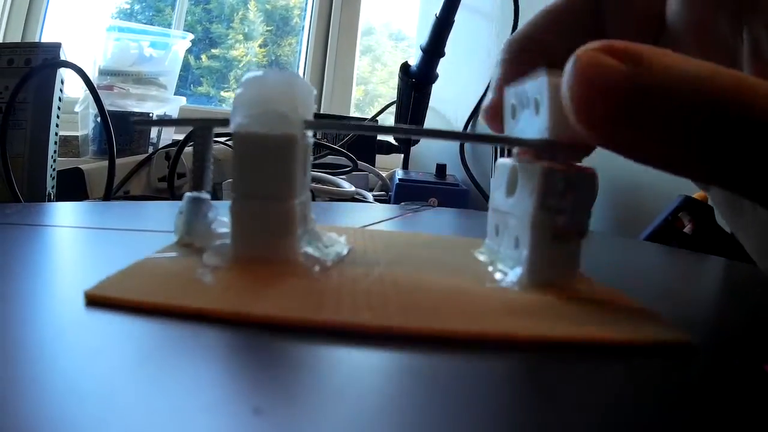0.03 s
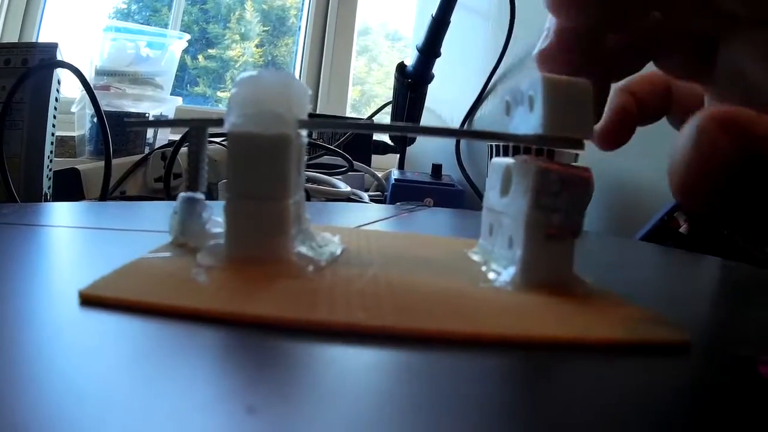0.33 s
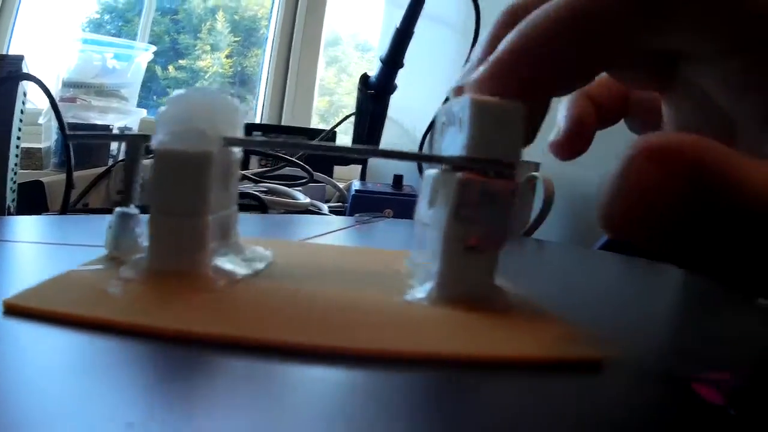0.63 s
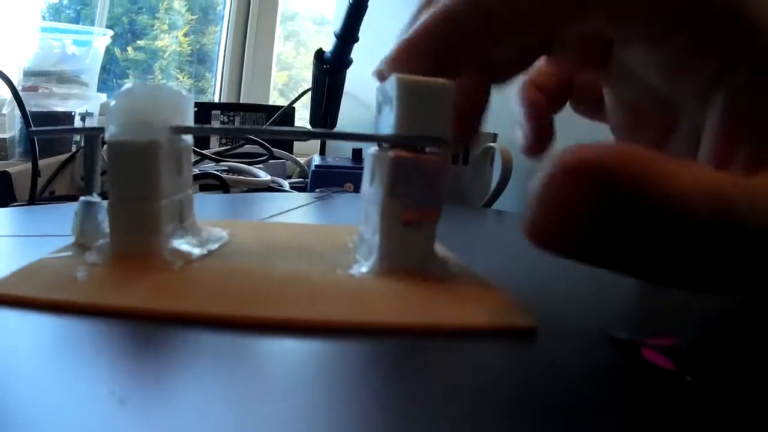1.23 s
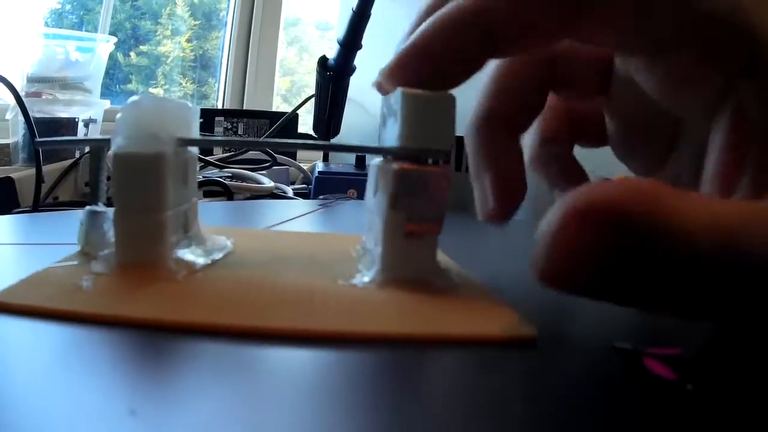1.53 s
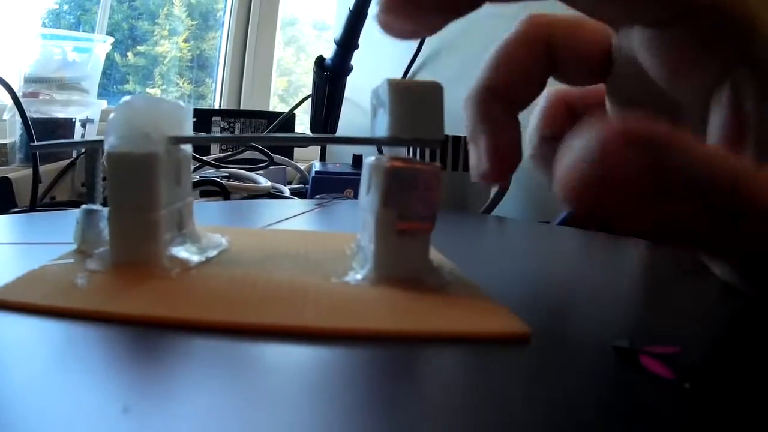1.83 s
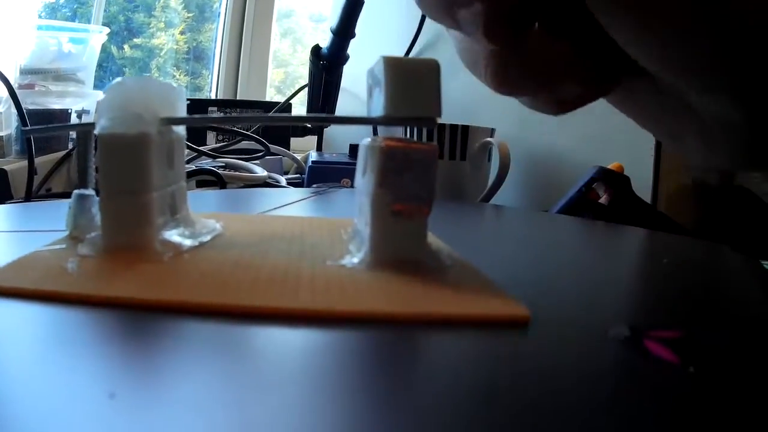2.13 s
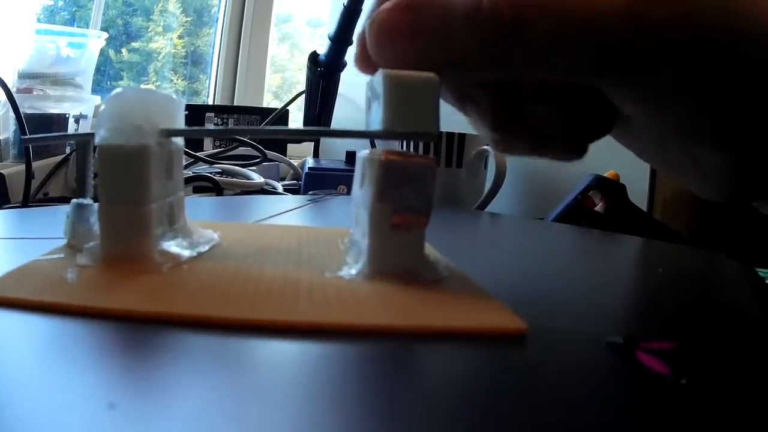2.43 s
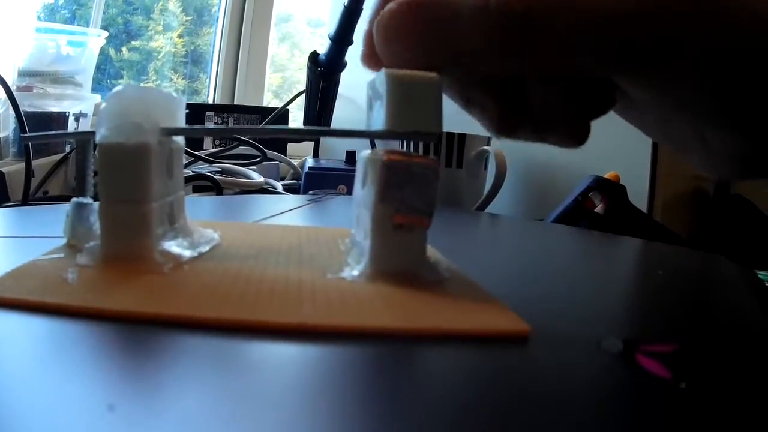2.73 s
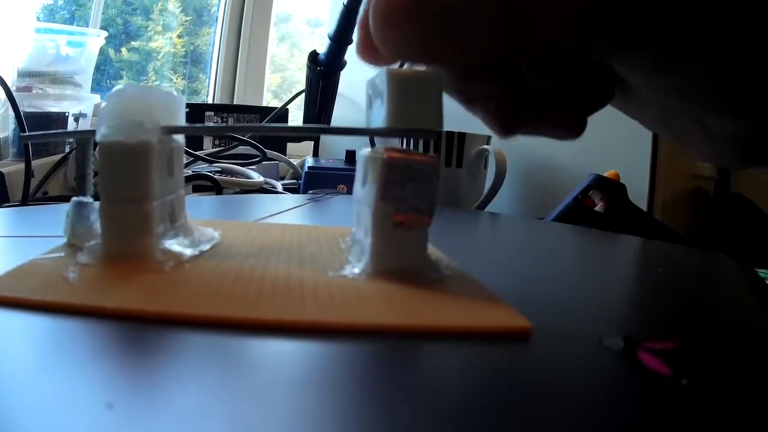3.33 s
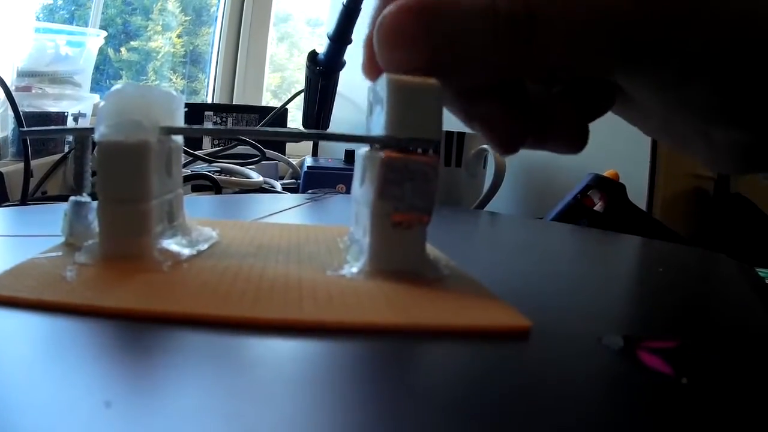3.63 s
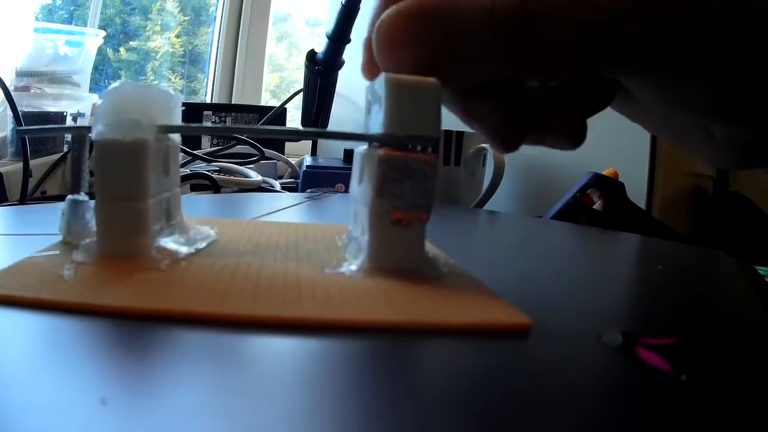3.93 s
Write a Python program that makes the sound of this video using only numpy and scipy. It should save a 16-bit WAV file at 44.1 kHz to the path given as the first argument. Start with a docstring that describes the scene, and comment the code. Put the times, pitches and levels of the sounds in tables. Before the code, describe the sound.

A homemade telegraph key knocks dully on a desk as a finger taps it unevenly.

```python
"""First comes a short wooden clatter: a homemade telegraph key is jostled on a desk in a small room.
Then a finger taps its metal lever onto a wooden post, close by. Each press knocks the baseboard,
brighter when harder, and the lever falls back softly on its rear stop. A few sharp ticks sound early on,
fingers rub faintly on the key, and halfway through a mains hum comes in over the quiet room noise."""
import sys
import numpy as np
from scipy import signal
from scipy.fft import rfft, irfft, next_fast_len
from scipy.io import wavfile
from scipy.ndimage import uniform_filter1d

SR = 44100
rng = np.random.default_rng(int(sys.argv[2]) if len(sys.argv) > 2 else 0)


def digitize_waveform(pressure):
    """Quantize a signal to 16-bit integers and store it at the path in sys.argv[1].

    Rows of a 2-D input are taken as channels; values are limited to [-1, 1].
    """
    field = np.atleast_2d(pressure).T
    bounded = np.clip(field, -1, 1)
    quanta = np.round(bounded * 32767).astype(np.int16)
    wavfile.write(sys.argv[1], SR, quanta)


N = 176400  # 4 seconds


def amp(db):
    """Turns decibels into a number to multiply a sound by."""
    return 10 ** (np.asarray(db) / 20)


def unit(x):
    """Scales a sound to an average (rms) level of 1."""
    return x / np.sqrt(np.mean(x ** 2) + 1e-20)


def along(points, hz):
    """Reads between the rows of a (pitch_hz, value) table, on a log pitch scale."""
    pitches, values = np.transpose(points)
    return np.interp(np.log(hz + 1), np.log(pitches + 1), values)


def filtered(x, gain_at):
    """Turns each frequency up or down by gain_at(hz)."""
    size = next_fast_len(len(x) + SR // 2)
    return irfft(rfft(x, size) * gain_at(np.fft.rfftfreq(size, 1 / SR)), size)[:len(x)]


def noise(tone, size):
    """Noise of level 1, shaped by a (pitch_hz, level_db) table."""
    return unit(filtered(rng.standard_normal(size), lambda hz: amp(along(tone, hz))))


def ring_time():
    """The half second after a blow, in seconds."""
    return np.arange(SR // 2) / SR


def fade(t, fade_s, hold_s=0):
    """Stays full for hold_s, then drops 60 dB every fade_s."""
    return np.exp(-np.log(1000) * np.maximum(t - hold_s, 0) / fade_s)


def ring(tones, hold_s=0, scatter_db=1.16):
    """A struck object rings with fading tones of alternating sign, a little different at each blow."""
    t, out = ring_time(), 0
    for k, (pitch_hz, level_db, fade_s) in enumerate(tones):
        gain = (-1) ** k * amp(level_db + scatter_db * rng.normal())
        out += gain * fade(t, fade_s, hold_s) * np.sin(2 * np.pi * pitch_hz * t)
    return out


def add(track, start_s, sound):
    """Mixes a sound into the track at start_s."""
    part = track[round(start_s * SR):][:len(sound)]
    part += sound[:len(part)]


# the tone of the room noise: pitch_hz, level_db
BACKGROUND_TONE = [(20, -9), (70, -8), (120, -8), (200, -14), (420, -20), (820, -22.5), (1250, -21),
                   (1600, -16.5), (2100, -27), (4000, -28.5), (8000, -30), (15800, -30.5)]

def room_noise(level_db=-66):
    """A faint, steady rush, strongest in the bass."""
    return amp(level_db) * noise(BACKGROUND_TONE, N)


def mains_hum(start_s=1.927, rise_s=0.048, pitch_hz=50, start_db=-60, growth_db_per_s=1.2):
    """A low electrical hum switches on and slowly grows."""
    t = np.arange(N) / SR - start_s
    switch_on = np.clip(t / rise_s, 0, 1)
    return switch_on * amp(start_db + growth_db_per_s * t) * np.sin(2 * np.pi * pitch_hz * t)


# how long the echoes take to die away: pitch_hz, fade_s
ECHO_FADES = [(100, 0.34), (300, 0.15), (1000, 0.25), (2000, 0.22), (4000, .22), (10000, .12)]
# the tone of the echoes: pitch_hz, level_db
ECHO_TONE = [(40, 5), (90, -0.5), (160, 6.5), (230, 3), (380, -4.5), (520, 4.5), (700, 1.5), (1100, -2),
             (1550, 0.5), (2000, -6.5), (2350, -9.5), (2650, -17.5), (3300, -15), (4200, -10), (5200, -16),
             (16000, -10)]

def wall_echoes(delay_s=0.0027, hold_s=0.028):
    """The walls send back a dense cloud of echoes that holds briefly, then dies, treble first."""
    t = ring_time()
    typical_fade = fade(t, np.median(np.array(ECHO_FADES)[:, 1]), hold_s)
    cloud = rng.standard_normal(len(t))
    for _ in range(3):  # even out the noise so that no pitch sticks out
        power = uniform_filter1d(np.abs(rfft(cloud * typical_fade)) ** 2, size=40)
        cloud = irfft(rfft(cloud) / np.sqrt(np.abs(power) + 1e-12), len(t))
    cloud = unit(filtered(cloud, lambda hz: amp(along(ECHO_TONE, hz))))
    band_hz, times_s, bands = signal.stft(cloud, SR, nperseg=256)
    bands *= fade(times_s, along(ECHO_FADES, band_hz)[:, None], hold_s)
    echoes = signal.istft(bands, SR, nperseg=256)[1][:len(t)]
    return echoes * np.clip(t / delay_s - 1, 0, 1)


# the dull sound of skin on the key: pitch_hz, level_db
SKIN_TONE = [(40, -13), (150, 5.5), (700, 9.5), (1400, -4), (2200, -15.5), (5000, -21), (16000, -35)]
# the scratchy part of a rub: pitch_hz, level_db
SCRATCH_TONE = [(200, -14), (1200, -4), (1550, 12), (2100, -25), (3000, -4), (4300, -9), (6000, -23),
                (16000, -29)]
# each rub: start_s, length_s, level_db, scratch_db
FINGER_RUBS = [(0, 0.071, -60.5, -20), (2.045, 0.013, -67.5, 6), (2.301, 0.022, -59.5, -24)]

def finger_rubs(rise_s=0.0017):
    """Skin slides on the key: a dull brush with some scratch on top."""
    out, t = np.zeros(N), ring_time()
    for start_s, length_s, level_db, scratch_db in FINGER_RUBS:
        skin = noise(SKIN_TONE, len(t)) + amp(scratch_db) * noise(SCRATCH_TONE, len(t))
        swell = (1 - np.exp(-t / rise_s)) * fade(t, fade_s=0.081, hold_s=length_s)
        add(out, start_s, amp(level_db) * skin * swell)
    return out


# each tick: start_s, level_db
SHARP_TICKS = [(0.5671, -30), (.757, -37), (.771, -44), (0.7839, -47.5), (0.793, -54)]
# the tones in a tick: pitch_hz, level_db, fade_s
TICK_RING = [(1530, -1, 0.0066), (2860, -0.5, 0.0026), (3770, 2, 0.0045), (5000, -11.5, 0.0036),
             (7100, -11.5, 0.0054), (13700, -14.5, 0.0042)]

def ticks():
    """Tiny bright ticks, very close and with no echo."""
    out = np.zeros(N)
    for start_s, level_db in SHARP_TICKS:
        add(out, start_s, amp(level_db) * ring(TICK_RING))
    return out


# the tones of the desk under the key: pitch_hz, level_db, fade_s
DESK_RING = [(72, -35, 0.047), (95, -1, 0.067), (119, 1.5, 0.1), (162.5, -4.5, 0.34), (221, -5, 0.041),
             (307, -3, 0.3)]
# the crack of metal making contact: pitch_hz, level_db
CRACK_TONE = [(300, 5.5), (2000, 2.5), (4000, 1), (4800, -11.5), (5700, -4), (6800, -10), (8500, -20.5),
              (10500, -12), (12000, -12), (16000, -22)]
FREE_RING_S = 0.0031  # the key rings freely until the finger's pressure damps it

def knock(tones, bright_hz, bass_db, walls, desk_db, echo_db=-16, fresh_share=0.58):
    """One blow rings the wood, thumps the desk and cracks; a softer contact dulls the wood and echoes."""
    t = ring_time()
    wood = ring(tones, FREE_RING_S) * (1 - np.exp(-t / 0.000052))  # starts almost at once
    # each blow mixes the shared room echoes with fresh random ones
    echoes = np.sqrt(1 - fresh_share) * walls + np.sqrt(fresh_share) * wall_echoes()
    crack_gain = amp(-12) * (bright_hz / 2500) ** 1.6  # harder blows crack louder
    crack = crack_gain * noise(CRACK_TONE, len(t)) * fade(t, fade_s=0.009)
    cut_treble = signal.butter(3, bright_hz, fs=SR, output="sos")
    body = signal.sosfilt(cut_treble, wood + amp(echo_db) * echoes) + amp(desk_db) * ring(DESK_RING)
    bass = signal.sosfilt(signal.butter(1, 376, fs=SR, output="sos"), body)  # the part below 376 Hz
    return body + (amp(bass_db) - 1) * bass + crack


# the tones of the baseboard slapping the desk: pitch_hz, level_db, fade_s
BOARD_RING = [(104, -1, 0.076), (152.3, -1, 0.092), (259, -10.5, 0.042), (370, -5, 0.043),
              (613, -8.5, 0.09), (760, -4.5, 0.011), (833, -8, 0.014), (1086, -0.5, 0.017),
              (1445, -5, 0.009), (1820, -13, 0.013), (2190, -22, 0.013), (3760, -8.5, .008),
              (5760, -16, 0.0086)]
# each jolt: start_s, level_db, bright_hz (treble is cut above it), bass_db (bass boost or cut)
BOARD_JOLTS = [(0.0412, -45, 3170, -10), (0.0448, -48.5, 2360, -10), (0.0825, -28.5, 2380, -1.5),
               (.0866, -31.5, 4850, 3.5), (0.1167, -34.5, 2460, -7.5), (0.1276, -47, 4320, 0),
               (1.796, -45.5, 1700, -8)]

def board_jolts(walls):
    """The key is jostled, so its baseboard slaps the desk."""
    out = np.zeros(N)
    for start_s, level_db, bright_hz, bass_db in BOARD_JOLTS:
        add(out, start_s, amp(level_db) * knock(BOARD_RING, bright_hz, bass_db, walls, desk_db=-15))
    return out


# the tones of the lever, post and baseboard: pitch_hz, level_db, fade_s
KEY_RING = [(170, -10.5, 0.056), (282.5, -8, 0.042), (392.5, -23, 0.12), (660, -1.5, 0.021),
            (842, -12, 0.0069), (1057, -6.5, 0.037), (1383, -1.5, 0.019), (1790, -12.5, 0.035),
            (1932, -16, 0.018), (2288, -14.5, 0.011), (2970, -20.5, 0.0034), (3490, -15.5, 0.01),
            (3960, -9, 0.0092), (4318, -11, 0.0032)]
# the tones of the rear stop: pitch_hz, level_db, fade_s
STOP_RING = [(148, 1, 0.12), (308.6, 1.5, 0.046), (648, -0.5, 0.028), (937, -0.5, 0.028),
             (1095, -9.5, 0.032), (1350, -32, .02)]
# each press: start_s, level_db, bright_hz, bass_db, return_after_s, return_db
KEY_PRESSES = [(0.4729, -25, 1950, -1, .077, -46.5), (.658, -28.5, 1460, -0.5, .067, -45.5),
               (0.8993, -22.5, 2250, -2, 0.042, -47), (1.0751, -26.5, 1840, -2, 0.048, -44.5),
               (1.2813, -21.5, 2570, -2, .066, -44), (1.5788, -21.5, 2970, -1.5, .052, -46),
               (1.719, -24.5, 1530, -5, 0.049, -48.5), (2.4206, -30.5, 1200, -1, .044, -52),
               (2.5658, -25, 2180, 1.5, .054, -46), (2.7132, -25.5, 2330, -0.5, .052, -52.5),
               (2.9286, -22, 2640, -1, .06, -47), (3.1626, -22.5, 2600, -0.5, .075, -51.5),
               (3.4143, -29.5, 1240, -1, 0.059, -63), (3.5334, -28.5, 1380, 0.5, .053, -54),
               (3.6877, -28, 1330, -2, .052, -51), (3.8159, -27.5, 1410, -5, .056, -48),
               (3.9617, -26.5, 1520, -4.5, .055, -50)]

def key_presses(walls, finger_db=-25, stop_rise_s=0.0015):
    """The finger lands, the lever hits the post, then it falls back softly on its rear stop."""
    out, t = np.zeros(N), ring_time()
    for start_s, level_db, bright_hz, bass_db, return_after_s, return_db in KEY_PRESSES:
        travel_s = 0.006 * float(amp(-24.5 - level_db))  # a softer press reaches the post more slowly
        finger = noise(SKIN_TONE, len(t)) * fade(t, fade_s=0.2, hold_s=travel_s)
        add(out, start_s - travel_s, amp(level_db + finger_db) * finger)
        add(out, start_s, amp(level_db) * knock(KEY_RING, bright_hz, bass_db, walls, desk_db=-35.5))
        rear_stop = ring(STOP_RING, FREE_RING_S) * (1 - np.exp(-t / stop_rise_s))
        add(out, start_s + return_after_s, amp(return_db) * rear_stop)
    return out


def scene():
    """Mixes the key, rubs, ticks, hum and room noise into one channel."""
    walls = wall_echoes()  # the echoes that all knocks share
    key = key_presses(walls) + board_jolts(walls)
    return (key + finger_rubs() + ticks() + mains_hum() + room_noise())[None]


def record(dry):
    """Cuts off the very highest treble, above 15900 Hz."""
    return np.array([filtered(channel, lambda hz: hz < 15900) for channel in dry])


dry = scene()
out = record(dry)
digitize_waveform(out)
```